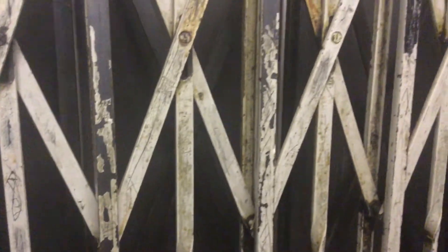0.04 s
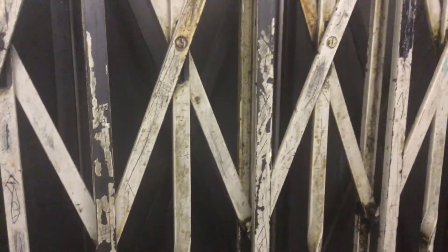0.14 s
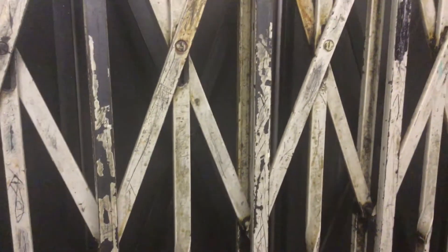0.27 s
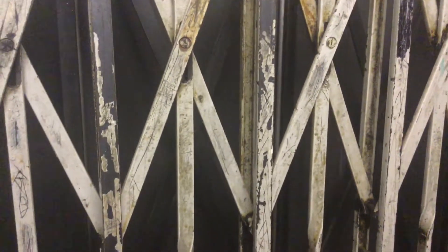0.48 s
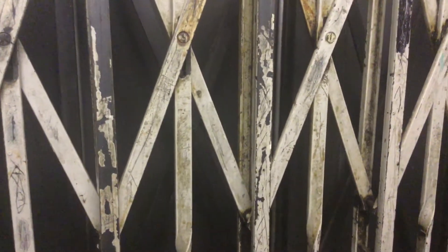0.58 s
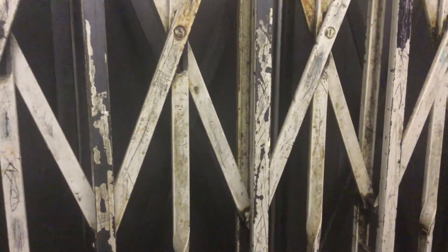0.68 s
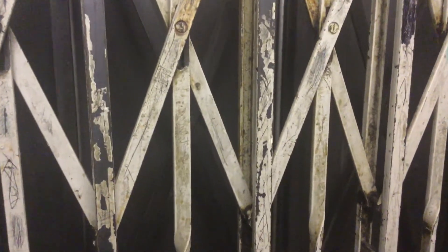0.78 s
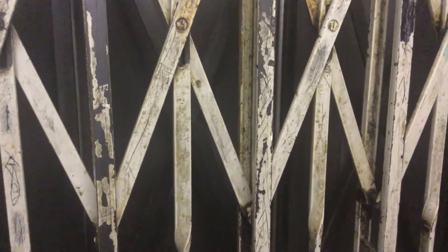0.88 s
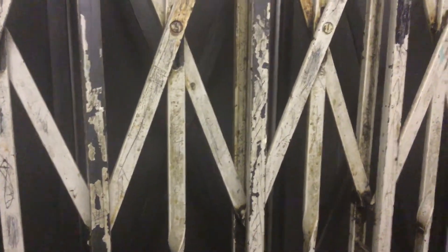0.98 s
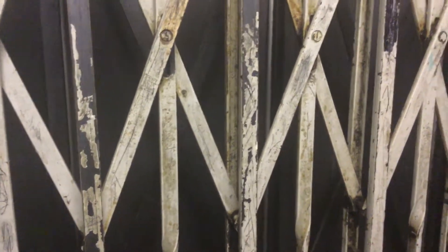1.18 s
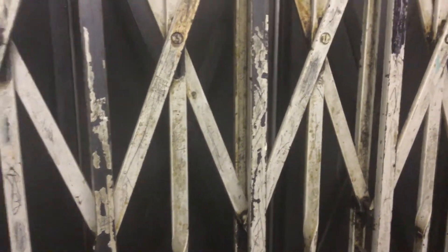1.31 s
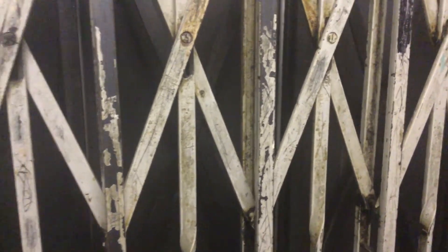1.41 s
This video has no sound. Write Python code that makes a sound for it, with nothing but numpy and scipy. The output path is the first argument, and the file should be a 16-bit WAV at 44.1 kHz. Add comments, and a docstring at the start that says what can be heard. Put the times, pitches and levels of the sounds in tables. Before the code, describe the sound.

A folding steel lift gate rattles from the start, close up, with a thin, high squeak near 0.15 seconds. At 0.2 it slams shut with a sharp clack, and the small car's panels boom and die away. It rebounds with a light ring at 0.4, then settles with two lighter clacks around 0.8 and 1.0, latching on the last. A faint, low rumble slowly eases underneath.

```python
"""A folding steel lattice gate is pushed home in a small lift car. Its bars rattle, steel on steel,
and a dry pivot squeaks. The gate slams into its stop post with a sharp clack, and the jolt sets the
car's panels booming. It rebounds, ringing a loose strut, then settles with two lighter clacks, the
latch dropping in on the last. Under it all, a faint rumble in the shaft slowly eases."""
import sys
import numpy as np
from scipy import signal
from scipy.fft import irfft, next_fast_len
from scipy.io import wavfile

SR = 44100
rng = np.random.default_rng(int(sys.argv[2]) if len(sys.argv) > 2 else 0)


def materialize(psi):
    """Save the field psi as 16-bit PCM at rate SR to the path in sys.argv[1].

    A 1-D psi becomes a single channel; in a 2-D psi each row is a channel.
    """
    bounded = np.clip(np.atleast_2d(psi).T, -1, 1)
    quanta = np.round(bounded * 32767).astype(np.int16)
    wavfile.write(sys.argv[1], SR, quanta)


N = 63945
TIME = np.arange(N) / SR

# steel meets steel: t/s, rise/s, then level/dB at each pitch of TONE_HZ
CONTACTS = [ (0.000, 0.002, -44.5, -61, -41, -44, -46), (0.008, 0.0066, -42, -49, -65, -50, -60),
            (0.0355, .0002, -50.5, -34.5, -38.5, -37.5, -40), (0.081, 0.002, -44, -35.5, -47, -48.5, -72.5),
            (0.120, 0.016, -59, -45, -41, -51, -64), (0.158, 0.001, -39, -49, -39.5, -40, -61),
            (0.199, .0005, -40, -41, -31.5, -23, -31.5), (0.2067, 0.0008, -40, -30, -20, -15, -16),
            (0.2155, 0.003, -21.5, -21.5, -22, -50, -52), (0.4276, 0.00049, -47, -46.5, -40, -38.5, -45),
            (0.817, 0.0078, -60, -43.5, -54, -63, -63.5), (0.8421, 0.00035, -53.5, -49, -62.5, -37.5, -39),
            (0.877, 0.0036, -51.5, -55.5, -55, -52.5, -75),
            (0.9927, 0.0041, -46.5, -38.5, -42, -39.5, -43.5),
            (1.025, 0.0039, -43, -41, -51.5, -39.5, -57.5), (1.143, 0.0024, -61, -60, -59.5, -88, -94.5),
            (1.345, .008, -56.5, -61.5, -77, -104, -115)]
TONE_HZ = (450, 1100, 2300, 5200, 13000)


def clatter():
    """Each contact cracks, then sets the dense resonances of lattice and car ringing."""
    # ring time of those resonances: f/Hz, t60/s
    decay = [(100, 0.5), (300, 0.79), (600, 0.42), (1300, 0.45), (2000, 0.29), (3000, 0.3), (5000, 0.24),
             (9000, 0.21), (15000, 0.12)]
    out, ripple = np.zeros(N), clusters()
    pushes = np.array([np.diff(swelling(s, rise) ** 2, prepend=0) for s, rise, *_ in CONTACTS])
    edges_hz = np.geomspace(50, 17000, 19)
    for low, high in zip(edges_hz, edges_hz[1:]):
        hz = np.sqrt(low * high)
        energy = strengths(hz) ** 2 @ pushes
        # crack, close reflections, diffuse ring: level/dB, t60/s
        stages = (-5, 0.0071), (-13.5, 0.13), (-1.5, at_hz(decay, hz))
        power = sum(from_db(db) ** 2 * linger(energy, t60) for db, t60 in stages)
        out += np.sqrt(power) * noise(low / 1.05, high * 1.05, ripple)
    shudder = from_db(0.68 * noise(40, 300))   # loose joints shake the level
    return lattice_colour(out * shudder)


def strengths(hz):
    """How hard each contact drives a pitch; bars give off little bass and little extreme treble."""
    levels = [np.interp(np.log(hz), np.log(TONE_HZ), tone_db) for _, _, *tone_db in CONTACTS]
    bass_cut_hz, treble_cut_hz = 200, 24000
    return from_db(levels) / np.sqrt(1 + (bass_cut_hz / hz) ** 6 + (hz / treble_cut_hz) ** 8)


def clusters():
    """Spectral ripple where the steel's resonances bunch or thin out, flattening towards the bass."""
    spread_db, spacing_hz = 2, 45
    hz = np.linspace(0, SR / 2, next_fast_len(N, real=True) // 2 + 1)
    heights_db = spread_db * rng.standard_normal(4000)
    depth = np.clip(hz / TONE_HZ[1], 0, 1)
    return from_db(depth * np.interp(hz / spacing_hz, np.arange(len(heights_db)), heights_db))


def lattice_colour(x):
    """The lattice's broad resonances and hollows colour a sound like a chain of bell filters."""
    # peaks and dips: f/Hz, level/dB, width/Hz
    bells = [(604, 1.5, 23), (737, 6, 100), (905, -4, 200), (1124, 2.5, 38), (1700, 1, 200),
             (2240, 4.5, 150), (3500, -4, 690), (4840, 3.5, 400), (6300, -2.5, 400)]
    for hz, db, width_hz in bells:
        w, g = 2 * np.pi * hz / SR, from_db(db / 2)
        a, c = np.sin(w) * width_hz / (2 * hz), -2 * np.cos(w)
        x = signal.lfilter([1 + a * g, c, 1 - a * g], [1 + a / g, c, 1 - a / g], x)
    return x


def bars():
    """Every contact strikes the clear modes of the bars with strengths of its own."""
    # bar modes: f/Hz, level/dB, t60/s
    modes = [(1042.6, -9, 0.21), (1445, -9, 0.16), (2310, -10, .25), (3643, -11.5, 0.2), (4286, -7, 0.24),
             (4960, -11, 0.17), (5400, -11.5, .21), (5543, -11.5, .21), (5886, -11.5, 0.19),
             (7890, -9.5, .18), (8356, -9, 0.19), (8570, -6.5, 0.15), (9292, -9.5, .15)]
    spread_db = 2
    out, times = np.zeros(N), [row[0] for row in CONTACTS]
    chance = rng.standard_normal((len(CONTACTS), 2, len(modes))).T
    for (hz, db, t60), (scatter, polarity) in zip(modes, chance):
        sizes = strengths(hz) * np.sign(polarity) * from_db(db + spread_db * scatter)
        out += resonate(clicks(times, sizes), hz, t60)
    return out


def stop_post():
    """The stop post takes a few cycles to swing out, then clangs."""
    # the leading bar slams into the post: t/s, level/dB
    slam = [(0.2127, 1)]
    # post modes: f/Hz, level/dB, t60/s
    modes = [(228.9, -12, .2), (372, -7.5, 0.14), (1009, -20.5, .2), (1066, -20, .15), (1238, -22.5, .22),
             (1436, -18, .19), (1705, -23, 0.34), (1786, -21, .25), (2357, -23, 0.22)]
    s, hit_db = np.transpose(slam)
    blow = clicks(s, from_db(hit_db))
    return sum(from_db(db) * swing(blow, hz, t60, cycles=2.5) for hz, db, t60 in modes)


def panels():
    """Jolts swell into the panels' modes, the lowest last, and into the diffuse boom of the car."""
    # jolts that reach the panels: t/s, level/dB
    jolts = [(0.022, -17.5), (0.2184, -1), (0.262, -12), (0.405, -20)]
    # panel modes: f/Hz, level/dB, t60/s
    modes = [(99.2, -33, 3), (110.4, -24.5, 0.51), (148.7, -24, 2.1), (174.6, -20.5, 1.6),
             (183.1, -29.5, 1.7), (211.5, -13, 0.12), (272.2, -21, 1.1), (302.1, -15.5, 0.51),
             (347.6, -17.5, 0.75), (466.5, -18.5, 0.34), (497, -26, 0.34), (576.4, -13.5, 0.26),
             (675, -21.5, 0.24), (754, -27, 0.25)]
    soft_hz = 259.6   # above this pitch gentle jolts lose their bite
    s, jolt_db = np.transpose(jolts)
    ring = np.zeros(N)
    for k, (hz, db, t60) in enumerate(modes):
        blows = clicks(s, from_db(jolt_db * max(1, np.sqrt(hz / soft_hz))))
        ring += (-1) ** k * from_db(db) * swing(blows, hz, t60, cycles=2.3)
    boom_power = sum((from_db(db) * swelling(start, rise_s=0.028) * dying(start, t60=1.5)) ** 2
                     for start, db in jolts)
    return ring + from_db(-25.5) * np.sqrt(boom_power) * noise(98, 293)


def pivot():
    """The dry pivot gives a thin, unsteady rising whistle, smeared by the walls."""
    # path of the squeak: t/s, f/Hz, level/dB
    squeak = [(0.134, 10200, -50), (0.141, 10380, -26.5), (0.149, 10560, -30.5), (0.153, 10800, -25),
              (0.168, 10950, -29.5), (0.181, 11250, -31), (0.190, 11200, -39.5), (0.198, 11050, -57.5)]
    s, hz, db = np.transpose(squeak)
    wobble_hz = 110
    pitch = np.interp(TIME, s, hz) + wobble_hz * noise(54, 600)
    envelope = from_db(np.interp(TIME, s, db)) * (TIME > s[0]) * (TIME < s[-1])
    tone = envelope * np.sin(2 * np.pi * np.cumsum(pitch) / SR)
    walls = rng.standard_normal(N) * dying(0, t60=0.15)
    smear = signal.fftconvolve(tone, walls / np.linalg.norm(walls))[:N]
    return tone + from_db(-3.5) * smear


def strut():
    """A loose strut rings as the gate rebounds and settles."""
    # knocks on the strut: t/s, level/dB
    hits = [(0.4275, -2.5), (0.843, -12)]
    # strut modes: f/Hz, level/dB, t60/s
    modes = [(1608, -40, 0.43), (1725, -43, 0.41), (1844, -41, 0.37), (1994, -45, 0.41),
             (4366, -34.5, 0.12), (4766, -35.5, 0.24), (4950, -43, .2), (5110, -45.5, 0.2)]
    return knock(hits, modes)


def latch():
    """The latch drops in with two short rings."""
    # latch strikes: t/s, level/dB
    hits = [(0.996, 0.5), (1.031, 3.5)]
    # latch modes: f/Hz, level/dB, t60/s
    modes = [(265.6, -41, 0.57), (1141, -40.5, 0.23), (2293, -53, 0.49), (2620, -45, 0.15),
             (4540, -49, .15), (4850, -43, 0.14), (4894, -42, 0.14), (5100, -47, 0.13)]
    return knock(hits, modes)


def shaft():
    """A dull bed of rumble in the shaft slowly eases."""
    # rumble spectrum: f/Hz, relative level/dB
    spectrum = [(30, -22.5), (55, -14.5), (100, 5), (170, -5.5), (330, -3), (700, -16), (1500, -19.5),
                (2500, -37.5), (4500, -56), (14000, -67)]
    start_db, fade_db_per_s = -44, 7.5
    rumble = shaped_noise(lambda hz: from_db(at_hz(spectrum, hz)))
    return from_db(start_db - fade_db_per_s * TIME) * rumble


def knock(hits, modes):
    """A small part rings with its own modes at every hit."""
    s, hit_db = np.transpose(hits)
    blows = clicks(s, from_db(hit_db))
    return sum(from_db(db) * resonate(blows, hz, t60) for hz, db, t60 in modes)


def swing(x, hz, t60, cycles):
    """A heavy part's mode builds up over some cycles before it dies away."""
    swell_t60 = 1 / (1 / t60 + hz / (np.log(1000) * cycles))
    return resonate(x, hz, t60) - resonate(x, hz, swell_t60)


def resonate(x, hz, t60):
    """A unit click sets a sine of height 1 ringing."""
    r, w = np.exp(-np.log(1000) / (t60 * SR)), 2 * np.pi * hz / SR
    return signal.lfilter([0, np.sin(w)], [1, -2 * r * np.cos(w), r * r], x)


def clicks(times, sizes):
    """One impulse for each blow."""
    return np.bincount((np.clip(times, 0, None) * SR).astype(int), sizes, N)[:N] + 1e-18


def linger(energy, t60):
    """Energy that is fed in drains away."""
    return signal.lfilter([1], [1, -np.exp(-2 * np.log(1000) / (t60 * SR))], energy + 1e-18)


def swelling(start, rise_s):
    """Attack envelope that rises smoothly from 0 to 1."""
    return 1 - np.exp(-np.clip((TIME - start) / rise_s, 0, 40))


def dying(start, t60):
    """Envelope that jumps to 1 and dies away."""
    return (TIME >= start) * np.exp(-np.log(1000) * np.maximum(TIME - start, 0) / t60)


def noise(low_hz, high_hz, ripple=1):
    """Steep-sided band of noise with an optional ripple in its spectrum, rms 1."""
    width_hz = high_hz - low_hz
    return shaped_noise(lambda hz: ripple / (1 + ((hz - low_hz * high_hz / hz) / width_hz) ** 4))


def shaped_noise(gain_at):
    """Noise whose spectrum follows a function of pitch, rms 1."""
    size = next_fast_len(N, real=True)
    hz = np.maximum(np.arange(size // 2 + 1) * SR / size, 1)
    x = irfft(gain_at(hz) * rng.standard_normal(2 * len(hz)).view(complex), size)[:N]
    return x / x.std()


def at_hz(points, hz):
    """Read a table on a log-frequency axis."""
    f, value = np.transpose(points)
    return np.interp(np.log(hz), np.log(f), value)


def from_db(db):
    """Decibels to gain."""
    return 10 ** (np.asarray(db) / 20)


def scene():
    """Gate, car and shaft, close up and in mono."""
    return (clatter() + bars() + stop_post() + panels() + pivot() + strut() + latch() + shaft())[None]


def record(dry):
    """The loudest peaks are rounded; deep bass and the very top are cut."""
    ceiling, low_cut_hz, high_cut_hz = 1.9, 60, 15800
    rounded = ceiling * np.tanh(dry / ceiling)
    x = signal.sosfilt(signal.butter(2, low_cut_hz, "high", fs=SR, output="sos"), rounded)
    return signal.sosfilt(signal.ellip(12, .2, 90, high_cut_hz, fs=SR, output="sos"), x)


dry = scene()
out = record(dry)
materialize(out)
```